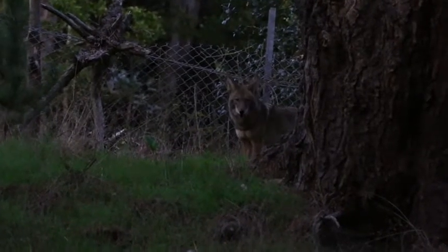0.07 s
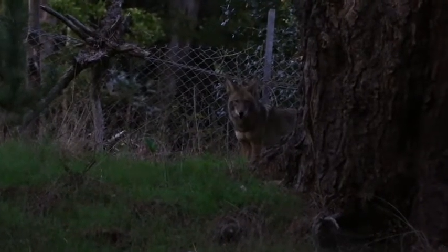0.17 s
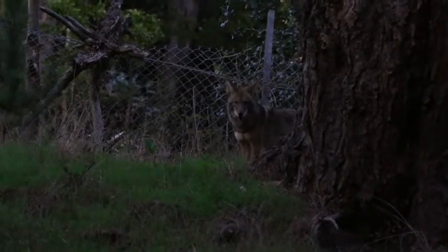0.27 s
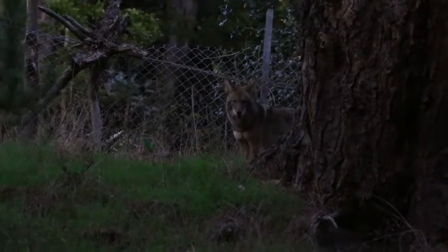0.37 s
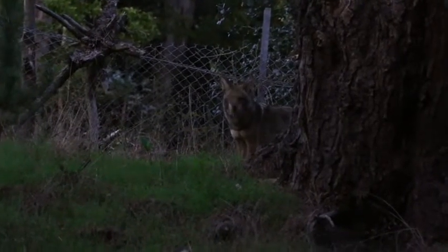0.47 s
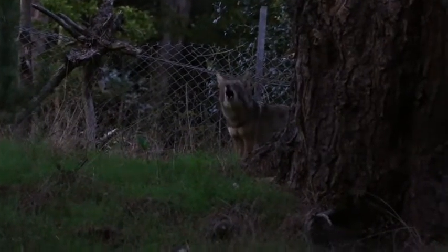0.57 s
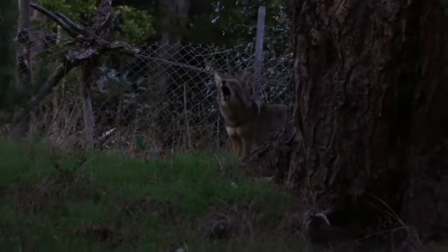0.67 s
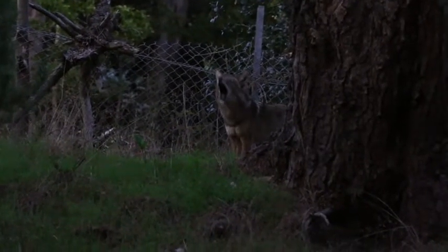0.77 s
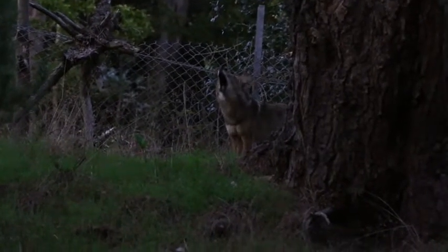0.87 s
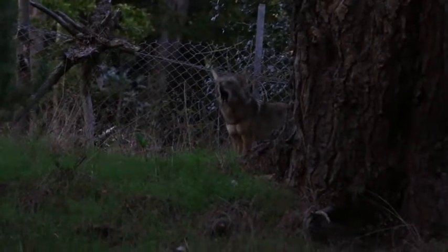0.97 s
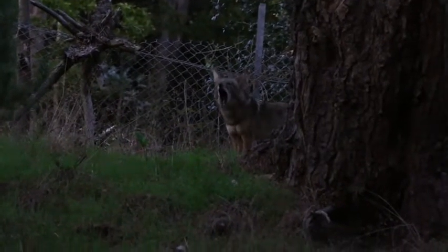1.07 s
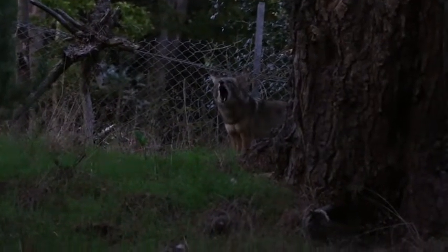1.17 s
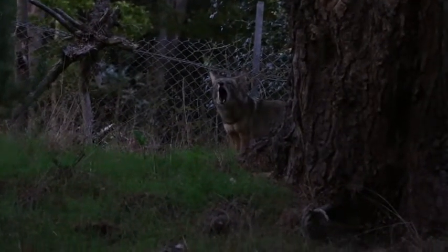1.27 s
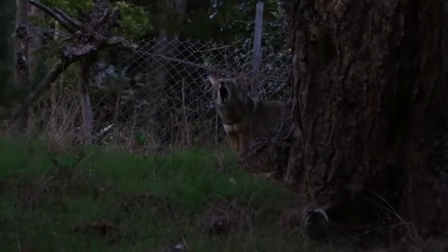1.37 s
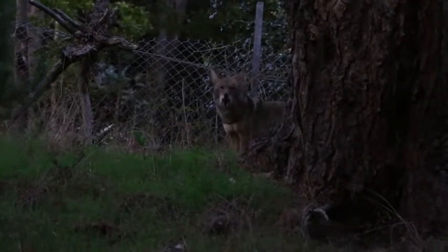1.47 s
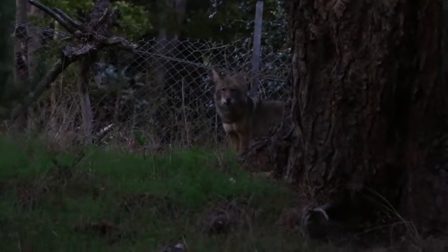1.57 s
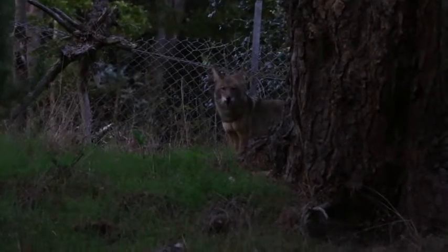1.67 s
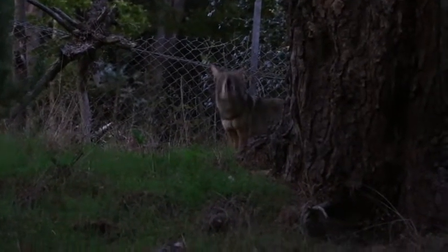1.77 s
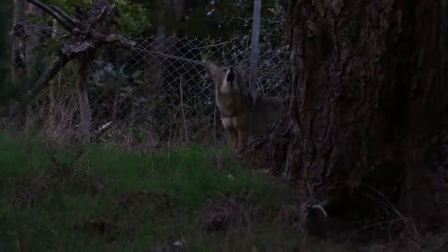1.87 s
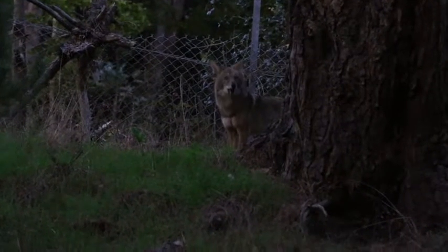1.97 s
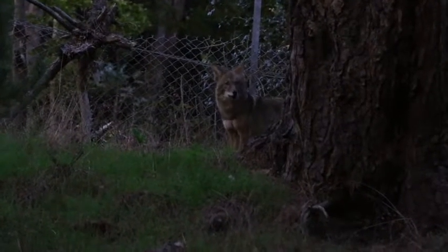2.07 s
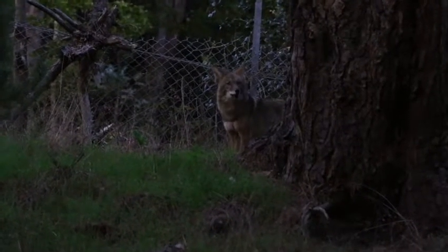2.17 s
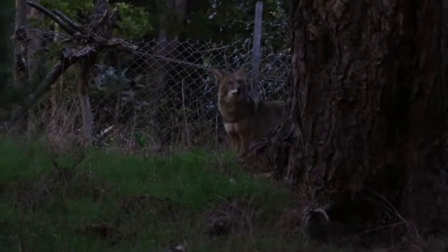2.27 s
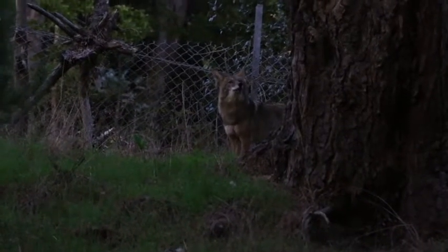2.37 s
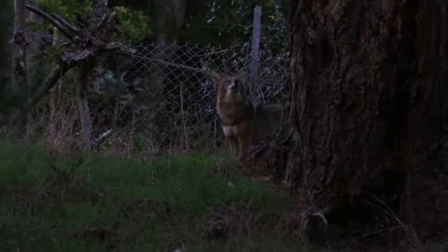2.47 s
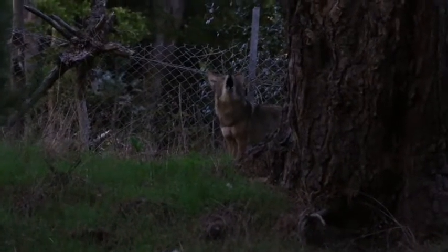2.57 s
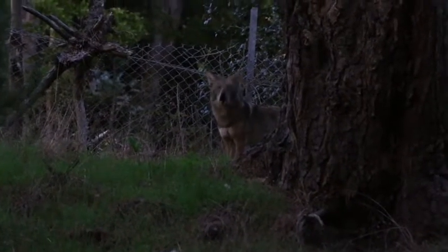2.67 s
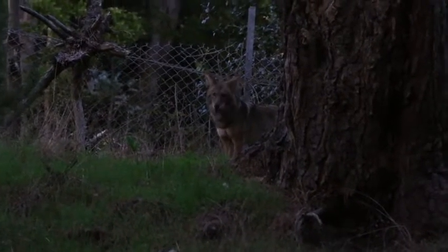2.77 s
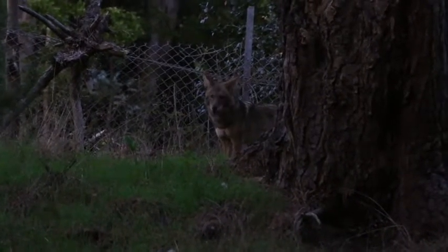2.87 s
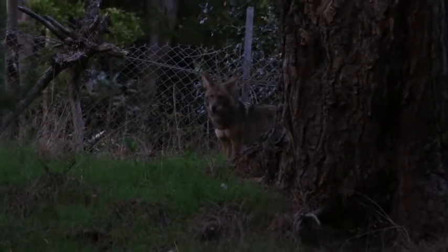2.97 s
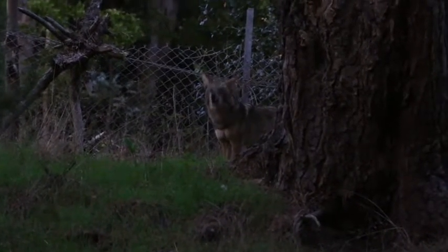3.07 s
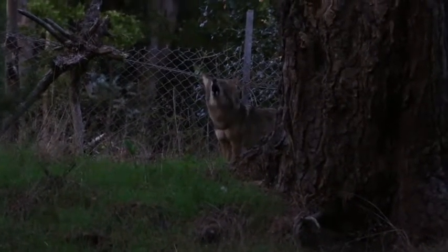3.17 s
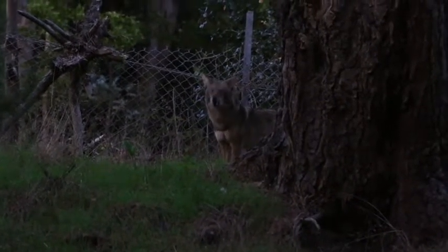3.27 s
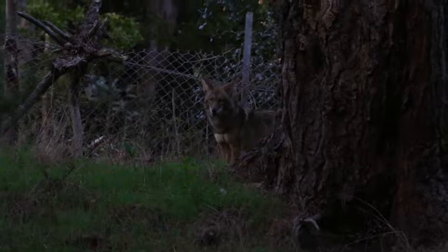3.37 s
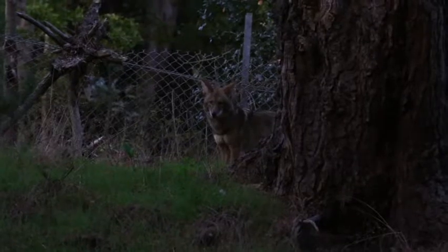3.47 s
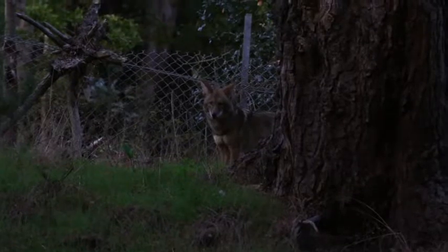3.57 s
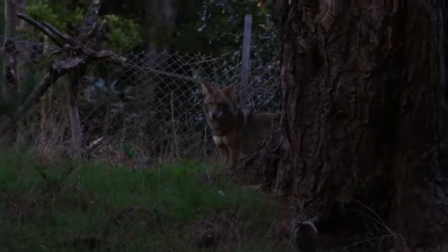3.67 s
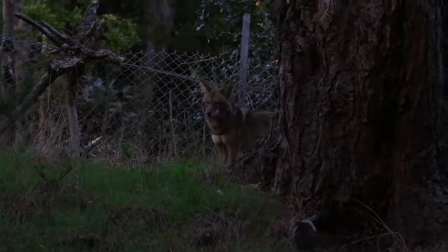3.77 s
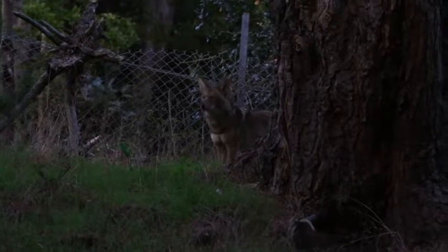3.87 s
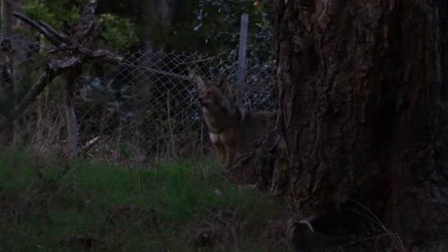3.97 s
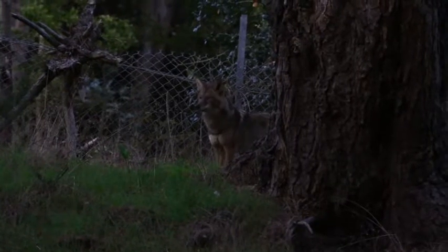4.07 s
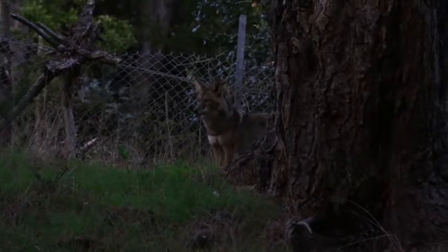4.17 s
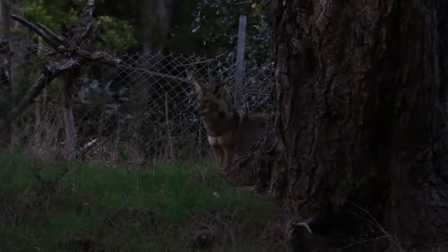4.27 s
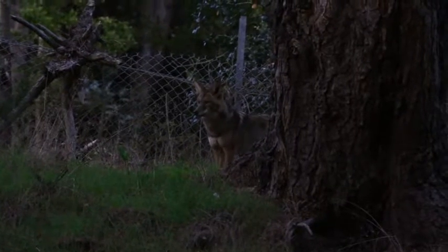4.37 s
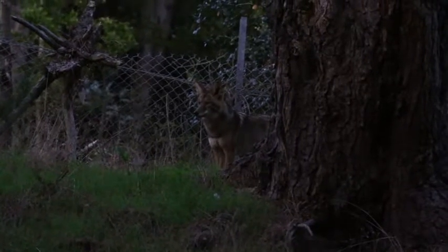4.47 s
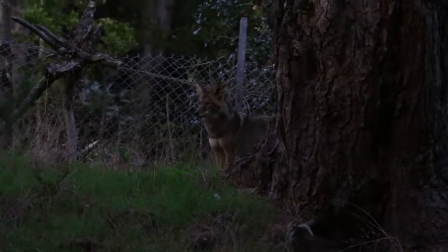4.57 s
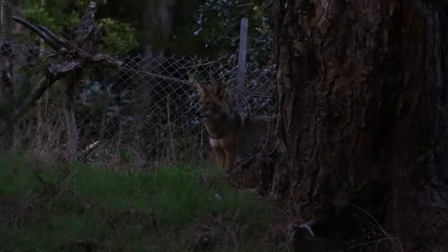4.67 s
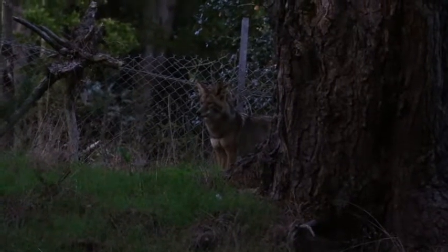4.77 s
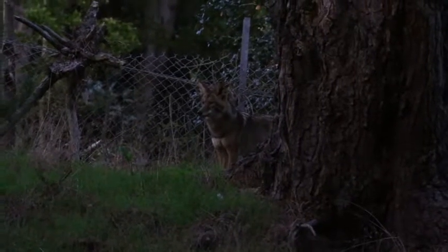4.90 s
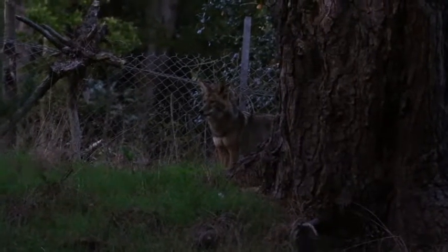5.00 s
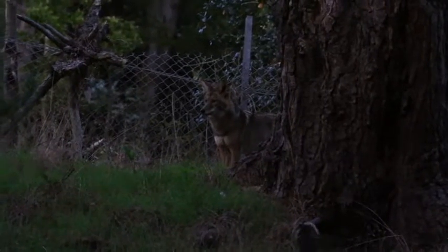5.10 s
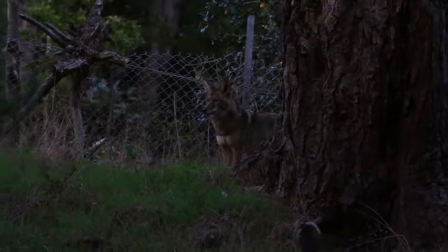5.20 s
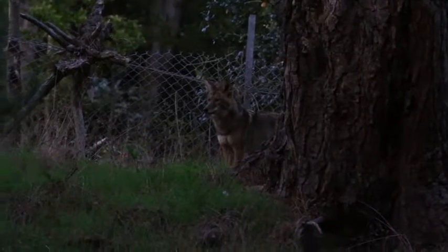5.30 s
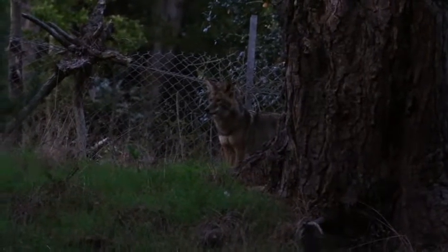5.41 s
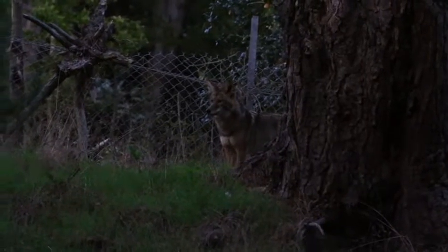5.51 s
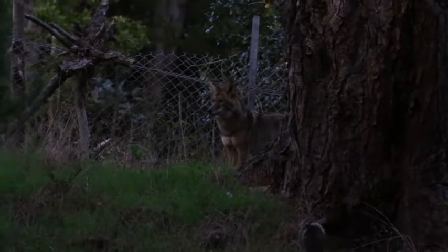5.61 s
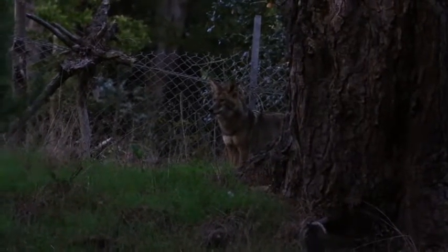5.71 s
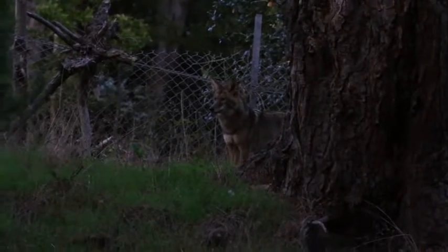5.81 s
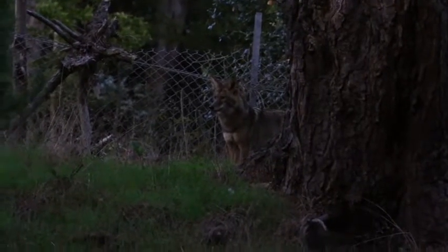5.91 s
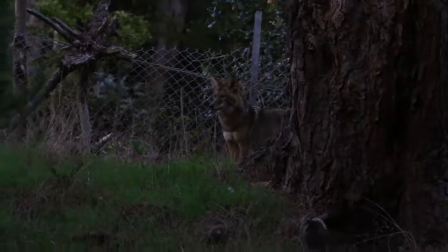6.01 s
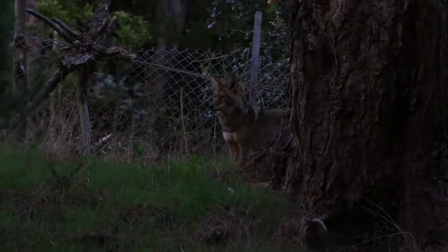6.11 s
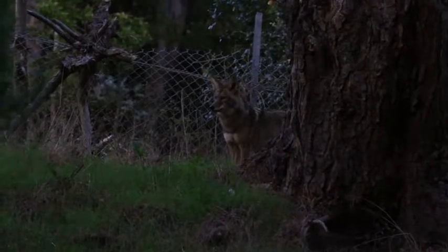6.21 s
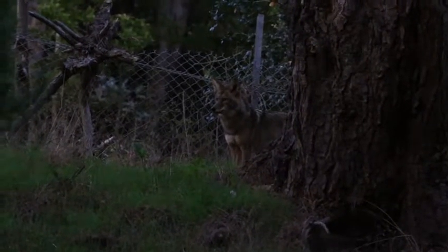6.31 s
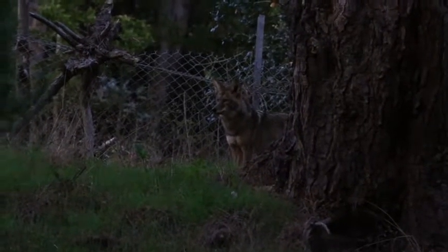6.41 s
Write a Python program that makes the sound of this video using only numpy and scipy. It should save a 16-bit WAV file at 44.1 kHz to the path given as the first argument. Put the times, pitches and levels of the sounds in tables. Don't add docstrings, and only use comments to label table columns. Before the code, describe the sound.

Hoarse coyote barks crack into shrill yelps, then three lone barks echo among trees; a distant dog answers faintly above a soft steady rumble.

```python
import sys
import numpy as np
from scipy import signal
from scipy.fft import rfft, irfft
from scipy.io import wavfile
from scipy.ndimage import uniform_filter1d

SR = 44100
rng = np.random.default_rng(int(sys.argv[2]) if len(sys.argv) > 2 else 0)


def decibels_to_gain(level_db):
    exponent = np.asarray(level_db, float) / 20
    return 10 ** exponent


def store_pcm(level_fs):
    pcm = np.round(np.clip(level_fs, -1, 1) * 32767).astype(np.int16)
    wavfile.write(sys.argv[1], SR, np.atleast_2d(pcm).T)


N = 284445

# [f/Hz, level per Hz/dB]
HUM_COLOR = [(12, -30), (20, -32), (85, -0.5), (191, -4), (306, -1), (550, -6), (668, -6.5), (790, -4),
             (1010, -5.5), (2470, -31), (3860, -34.5), (4960, -33.5), (5400, -35.5), (15600, -44.5)]
# [t/s, level/dB]
HUM_LEVEL = [(0.0, -38.5), (6.45, -38.5)]
# [f/Hz, likeness -1 to 1]
HUM_LIKENESS = [(60, 0.97), (180, 1), (550, 0.91), (1650, 0.47), (4970, -0.35), (15000, 0.26)]
# [f/Hz, left over right/dB]
HUM_LEAN = [(60, 0.34), (380, 0.58), (2380, 0.68), (15000, 0.81)]
# [t/s, level/dB, f/Hz]
INSECT_TICKS = [(3.796, -63, 4650), (3.917, -73, 4600), (4.4772, -62, 4310), (4.6841, -63, 4460),
                (4.7086, -64, 4560), (4.9979, -64, 4344), (5.3635, -65, 4317), (5.4224, -63, 4510),
                (5.5401, -63, 4560), (5.6389, -63, 4330), (5.8649, -70, 4133), (6.1473, -59, 4880)]
# [t/s, length/s, start f/Hz, end f/Hz, level/dB]
BIRD_CHIPS = [
    (3.82, 0.053, 7800, 6380, -60),
    (3.855, 0.075, 6380, 6200, -61),
    (4.02, 0.052, 6640, 6600, -68),
    (4.585, .012, 6800, 7900, -61),
    (4.365, .02, 2700, 2900, -60),
    (6.145, 0.026, 5100, 4770, -54.5),
    (6.17, .06, 4800, 4800, -68),
    (6.345, 0.055, 8180, 8500, -64),
]
# [t/s, length/s, start f/Hz, end f/Hz, level/dB]
FAR_DOG_NOTES = [
    (4.02, 0.096, 857, 940, -37.5),
    (4.03, 0.085, 1791, 1990, -48.5),
    (4.115, 0.06, 2160, 2070, -51),
    (4.25, 0.091, 880, 830, -31),
    (4.24, 0.14, 458, 396, -37.5),
    (4.25, 0.14, 1190, 1274, -45),
]
# [f/Hz, time to die by 60 dB/s]
WOOD_RING = [(400, 0.64), (700, 1), (1400, 1), (2200, 0.82), (3000, 1), (4000, 0.85), (6000, 0.55),
             (9000, 0.6), (14000, 0.96)]
# [delay/s, level/dB]
TREE_ECHOES = [(0.019, -7), (0.043, -10), (0.074, -22), (0.131, -27), (0.199, -47), (.27, -80),
               (0.431, -35.5)]
# [f/Hz, level/dB]
WOOD_COLOR = [(300, -5.5), (700, -9), (1400, -5), (2800, -16), (3300, -14), (5000, -19), (9000, -19),
              (14000, -14.5)]
# [f/Hz, share]
WOOD_SPREAD = [(400, 0.071), (2000, 0.8), (6000, 3.6), (12000, 3.4)]
# [f/Hz, width/Hz, level/dB]
THROAT_RINGS = [(1030, 134, -3), (1392, 380, -13.5), (1709, 890, -8)]
# [f/Hz, width/Hz, level/dB]
TEETH_RINGS = [(3260, 216, -22.5), (3810, 520, -31), (5580, 400, -35), (6720, 760, -34), (7410, 900, -32),
               (8400, 1780, -39.5), (10600, 1100, -53), (13000, 3500, -55.5)]
# [length/s, start f/Hz, end f/Hz, level under the bark/dB]
TEETH_HISS = (0.07, 5050, 5704, -36)
# [t/s, length/s, effort level/dB, top f/Hz, share of length before the chest gives out]
BARKS = [
    (0.611, .114, -9.5, 742, 0.63),
    (1.855, 0.13, -9.5, 815.4, 0.82),
    (2.596, .127, -6, 783, 0.61),
    (3.181, .134, -10, 784.4, 0.925),
]
RUN_ON_BARKS = [
    (.895, .062, -7.5, 820, .75),
    (1.135, 0.097, -10, 831.5, 0.76),
]
# [t/s, length/s, effort level/dB, start f/Hz, top f/Hz]
GROWLED_STARTS = [
    (.84, 0.072, -10, 796, 1030),
    (0.889, 0.033, -8.5, 825, 972),
    (1.075, 0.09, -19, 834, 1176),
]
# [t/s, length/s, effort level/dB, start f/Hz, end f/Hz]
ROUGH_ENDS = [
    (.75, .055, -11, 880, 830),
    (1.02, 0.051, -15.5, 880, 756),
    (1.476, 0.052, -11.5, 1000, 580),
]
VOICE_CRACKS = [
    (1.315, .06, -12, 978.6, 941),
]
EARLIER_BARK = (-.2, 0.1847, -22.5, 775.5, 757)
# [rise/share of length, rise depth/dB, chest over mouth level/dB,
# chest fade/dB, mouth fade/dB, mouth f per pitch f]
BARK_KIND = (0.39, 37.5, 1, 4, 8.1, 3.127)
RUN_ON_KIND = (0.58, 33, 0.83, 3.5, 4.6, 3.23)
GROWL_KIND = (1.85, 15.5, -1.5, 27, -1, 2.44)
END_KIND = (0.22, 46, 0.17, 44, 21.5, 2.84)
CRACK_KIND = (0.75, 19, -17, 6, 20.5, 2.5)
EARLIER_KIND = (.3, 20, 7, 3.9, 6, 2.94)
BARK_ROUGH = (.22, .4)
RUN_ON_ROUGH = (.12, .3)
GROWL_ROUGH = (.2, .45)
END_ROUGH = (.15, .4)
CRACK_ROUGH = (.6, .45)
# [f/Hz, level/dB]
YELP_COLOR = [(3200, 0.5), (4300, -23), (5700, -32), (7200, -21.5), (8600, -27), (10000, -34.5),
              (11500, -34.5), (13000, -36), (15000, -37)]
# [t of the top/s, top f/Hz]
YELP_ARCHES = [
    (-.21, 1412),
    (.727, 1378),
    (.981, 1550),
    (1.235, 1465),
    (1.434, 1441),
    (2.69, 1350),
]
# [upper partials level/dB, half-pitch lines 0-1, hoarseness 0-1]
YELP_VOICES = [
    (-20.5, 0, 0.1),
    (-14.5, 0, 0.11),
    (-20, 0.98, 0.45),
    (-18.5, 0, 0.04),
    (-20, 0.03, 0.05),
    (-25.5, 0.37, 0.27),
]
# [t/s, level/dB]
YELP_BREATH = [
    [(-.26, -15.5), (-.17, -20)],
    [(.716, -7), (.74, -20), (.752, -14), (.76, -33)],
    [(.94, -12.5), (.962, -12), (1.0, -9.5), (1.015, -22.5), (1.035, -18.5)],
    [(1.222, -7), (1.25, -29.5), (1.28, -13), (1.293, -19), (1.306, -15), (1.324, -28)],
    [(1.364, -30.5), (1.392, -16), (1.405, -21), (1.455, -13.5), (1.472, -18.5), (1.48, -21), (1.491, -38)],
    [(2.665, -22), (2.69, -15), (2.72, -19.5)],
]


def evened(x):
    return x / np.sqrt(np.mean(x ** 2) + 1e-20)


def read(points, hz):
    f, value = np.transpose(points)
    return np.interp(np.log(hz + 1), np.log(f + 1), value)


def add(mix, s, sound):
    part = mix[round(s * SR):][:len(sound)]
    part += sound[:len(part)]


def wander(count, hz):
    pole = np.exp(-2 * np.pi * 1.5 * hz / SR)
    noise = rng.standard_normal(count + 2000)
    smooth = signal.lfilter([1], np.convolve([1, -pole], [1, -pole]), noise)
    return np.clip(evened(smooth[-count:]), -2, 2)


def resonate(x, hz, width):
    turn = np.exp(2j * np.pi * np.cumsum(hz * np.ones(len(x))) / SR)
    r = np.exp(-np.pi * width / SR)
    once = signal.lfilter([1 - r], [1, -r], x / turn)
    twice = signal.lfilter([1 - r], [1, -r], once)
    return 2 * (turn * twice).real


def hum(patchy_db=1.17):
    frames, hz = N // 256 + 5, np.fft.rfftfreq(1024, 1 / SR)
    a, b, c, d, patches = rng.standard_normal((frames, 513, 5)).T
    patches = uniform_filter1d(patches, size=8, axis=0)
    patches = evened(uniform_filter1d(patches, size=20, axis=1))
    same = np.clip(read(HUM_LIKENESS, hz), -1, 1)[:, None]
    left = a + 1j * b
    right = same * left + np.sqrt(1 - same ** 2) * (c + 1j * d)
    lean_db = np.outer([.5, -.5], read(HUM_LEAN, hz))[:, :, None]
    level_db = read(HUM_COLOR, hz)[:, None] + patchy_db * patches + lean_db
    spectra = np.array([left, right]) * decibels_to_gain(level_db)
    sound = signal.istft(spectra, nperseg=1024, noverlap=768)[1][:, :N]
    s, db = np.transpose(HUM_LEVEL)
    return decibels_to_gain(np.interp(np.arange(N) / SR, s, db)) * evened(sound)


def insect(length=0.0069):
    out, t = np.zeros(N), np.arange(0, length, 1 / SR)
    for s, db, hz in INSECT_TICKS:
        add(out, s, decibels_to_gain(db + 6) * np.sin(2 * np.pi * hz * t) * np.hanning(len(t)))
    return out


def far_calls(table, tone_share=0.23, blur=0.13):
    out = np.zeros(N)
    for s, length, hz, end_hz, db in table:
        glide = np.linspace(hz, end_hz, round(length * SR))
        tone = np.sqrt(2) * np.sin(2 * np.pi * np.cumsum(glide) / SR)
        fuzz = evened(resonate(rng.standard_normal(len(glide)), glide, blur * hz))
        note = tone_share * tone + 0.65 * fuzz
        add(out, s, decibels_to_gain(db) * note * signal.windows.tukey(len(glide), .5))
    return out


def wood(x, tail_db=-10, smear=.1):
    t = np.arange(2 * SR) / SR
    taps = rng.standard_normal((3, len(t)))
    build_up = np.clip((t - .006) / .03, 0, 1)
    hz, ts, z = signal.stft(taps * build_up, SR, nperseg=256)
    dying = decibels_to_gain(-60 * ts / read(WOOD_RING, hz)[:, None])
    tail = signal.istft(z * dying, SR, nperseg=256)[1][:, :len(t)]
    echoes = np.zeros(len(t))
    for s, db in TREE_ECHOES:
        spread_s = smear * s
        echoes += decibels_to_gain(db) * np.exp(-((t - s) / spread_s) ** 2) / np.sqrt(spread_s * SR)
    field = rfft(decibels_to_gain(tail_db) * tail / np.linalg.norm(tail[0]) + taps * echoes)
    hz = np.fft.rfftfreq(len(t), 1 / SR)
    sides = field[0] + read(WOOD_SPREAD, hz) * field[1:]
    sides = irfft(sides * decibels_to_gain(read(WOOD_COLOR, hz)))
    return signal.fftconvolve(x[None], sides, axes=1)[:, :len(x)]


def first_hiss():
    length, hz, end_hz, db = TEETH_HISS
    hisses = [(row[0], length, hz, end_hz, row[2] + db) for row in BARKS]
    return far_calls(hisses, tone_share=0, blur=.1)


def bark_motion(row, kind, roughness, climbs, chest_share=1):
    s, length, effort_db, first_hz, last_hz = row
    rise, depth_db, chest_db, chest_fade_db, mouth_fade_db, ratio = kind
    rough_start, rough_end = roughness
    give_out_db, give_out_s, wide_open_hz = 21, 0.009, 2700
    u = np.arange(0, length, 1 / SR) / length
    before = np.maximum(1 - u / rise, 0)
    after = np.maximum(u - rise, 0) / (1 - rise)
    level_db = effort_db - depth_db * before ** 1.75
    given_out = np.clip((u - chest_share) * length / give_out_s, 0, 1)
    path = np.sin(np.pi * .58 * u ** 1.3) if climbs else u
    hz = first_hz + (last_hz - first_hz) * path
    chest_level_db = level_db + chest_db - chest_fade_db * after ** 2 - give_out_db * given_out
    mouth_level_db = level_db - mouth_fade_db * after ** 2
    mouth_hz = np.minimum(ratio * hz, wide_open_hz)
    rough = rough_start + (rough_end - rough_start) * u
    return s, chest_level_db, hz, mouth_hz, mouth_level_db, rough


def bark(motion, count=2, half=2.62, lift=0.21, unveil=1.3, slide=.24, rasp=0.58, muzzle_hz=3400):
    s, chest_db, hz, mouth_hz, mouth_db, rough = motion
    jitter, shimmer_db, patch_db = .24, 7, 4.5
    size = len(hz)
    rough, opening = np.clip(rough, 0, 1), mouth_hz / 2600
    groups = np.cumsum(hz / count * (1 + jitter * rough * wander(size, 210))) / SR
    between = np.minimum(half * rough, 1)
    folds = np.zeros(size)
    for k in range(2, 34):
        folds += (between if k % count else 1) * np.cos(2 * np.pi * k * groups)
    folds *= decibels_to_gain(shimmer_db * rough * wander(size, 370))
    puffs = (.5 + np.exp(-(count * groups % 1) / 2.5)) * rng.standard_normal(size)
    drive = (1 - rough) * evened(folds) + rough * evened(puffs)
    airy = drive + rasp * rng.standard_normal(size)
    chest = evened(resonate(drive, hz, 300))
    lips = resonate(drive, np.minimum(1.16 * mouth_hz, 2800), 330)
    mouth = resonate(drive, mouth_hz, 520) + 0.55 * resonate(drive, 0.935 * mouth_hz, 400) - 0.63 * lips
    throat, teeth = np.zeros(size), np.zeros(size)
    for f, width, db in THROAT_RINGS:
        throat += decibels_to_gain(db) * resonate(drive, f * (1.17 * opening) ** lift, width)
    for f, width, db in TEETH_RINGS:
        teeth += decibels_to_gain(db + patch_db * wander(size, 20)) * resonate(airy, f * opening ** slide, width)
    muzzle = signal.butter(2, muzzle_hz, fs=SR, output="sos")
    body = signal.sosfilt(muzzle, 1.64 * throat - 0.69 * mouth)
    upper = (body + 1.23 * opening ** unveil * teeth) / np.std(mouth)
    sound = decibels_to_gain(chest_db) * chest + decibels_to_gain(mouth_db) * upper
    return s, sound * signal.windows.tukey(size, .3)


def yelp_motion(top, voice, effort):
    top_s, top_hz = top
    upper_db, half, hoarse = voice
    s, db = np.transpose(effort)
    t = np.arange(s[0], s[-1], 1 / SR)
    away = (t - top_s) / max(s[-1] - top_s, .05)
    droop = .125 * np.maximum(away, -away / 1.2) ** 3.2
    hz = top_hz * (1 - droop)
    effort_db = np.interp(t, s, db)
    catch = 0.13 * np.exp(-(t - s[0]) / .012)
    steady_db = upper_db - np.maximum(effort_db, -22)
    return s[0], hz, effort_db, steady_db, half + catch, hoarse + catch


def yelp(motion, breath_db=-10, hiss_db=10, dull_db=55):
    s, hz, effort_db, upper_db, half, hoarse = motion
    waver, slip = .001, .022
    flutter_db, flutter_hz = 8, 200
    size = len(hz)
    hoarse = np.clip(hoarse, 0, 1)
    pairs = np.cumsum(hz / 2 * (1 + (waver + slip * hoarse) * wander(size, 214))) / SR
    air = rng.standard_normal(size)
    breath = resonate(air, 1.8 * hz, 1900)
    hiss = sum(decibels_to_gain(db) * resonate(air, f, width) for f, width, db in TEETH_RINGS)
    hiss *= decibels_to_gain(hiss_db + wander(size, 60))
    voice = np.sqrt(hoarse) * (decibels_to_gain(breath_db) * np.sqrt(hoarse) * breath + hiss) / np.std(breath)
    for k in range(1, 22):
        octaves = np.maximum(np.log2(k * hz / 8400), 0)
        db = read(YELP_COLOR, k * hz / 2) + upper_db * (k > 2) - dull_db * hoarse * octaves
        db += flutter_db * hoarse * wander(size, flutter_hz)
        weight = 1
        if k % 2:
            weight = np.abs(half) * (0.27 if k == 1 else 1)
        voice += np.sqrt(2) * decibels_to_gain(db) * weight * np.cos(2 * np.pi * k * pairs + k * k)
    return s, decibels_to_gain(effort_db) * voice * signal.windows.tukey(size, .1)


def coyote(lead_s=.4):
    out = np.zeros(N + round(lead_s * SR))
    calls = []
    for rows, kind, rough, start in [(BARKS, BARK_KIND, BARK_ROUGH, .655),
                                     (RUN_ON_BARKS, RUN_ON_KIND, RUN_ON_ROUGH, .72)]:
        for s, length, db, hz, share in rows:
            climb = (s, length, db, start * hz, hz)
            calls.append(bark(bark_motion(climb, kind, rough, True, share)))
    for row in ROUGH_ENDS:
        calls.append(bark(bark_motion(row, END_KIND, END_ROUGH, False)))
    calls.append(bark(bark_motion(EARLIER_BARK, EARLIER_KIND, END_ROUGH, False)))
    for row in GROWLED_STARTS:
        calls.append(bark(bark_motion(row, GROWL_KIND, GROWL_ROUGH, True), count=3))
    for row in VOICE_CRACKS:
        calls.append(bark(bark_motion(row, CRACK_KIND, CRACK_ROUGH, False), count=3))
    for top, voice, effort in zip(YELP_ARCHES, YELP_VOICES, YELP_BREATH):
        calls.append(yelp(yelp_motion(top, voice, effort)))
    for s, sound in calls:
        add(out, s + lead_s, sound)
    small_body = signal.butter(3, 430, "high", fs=SR, output="sos")
    return signal.sosfilt(small_body, out)


def scene():
    voice = coyote()
    near = (voice + wood(voice))[:, -N:] * decibels_to_gain(np.array([[4.6], [3.5]]))
    dog = far_calls(FAR_DOG_NOTES)
    birds = far_calls(BIRD_CHIPS, tone_share=0.134, blur=.05)
    far = dog + birds + insect() + first_hiss()
    return near + far * decibels_to_gain(np.array([[.3], [-.3]])) + hum()


def roll_off(x):
    return signal.sosfilt(signal.butter(12, 15700, fs=SR, output="sos"), x)


def record(dry, knee_db=-25, share=0.41, recover_db=110, memory_s=0.47, memory_share=0.093):
    power_db = 10 * np.log10(abs(uniform_filter1d((dry ** 2).mean(0), size=600)) + 1e-12)
    fall = np.arange(N) * recover_db / SR
    held_db = np.maximum.accumulate(power_db + fall) - fall
    over_db = np.maximum(held_db - knee_db, 0)
    keep = np.exp(-1 / (memory_s * SR))
    memory_db = signal.lfilter([1 - keep], [1, -keep], over_db)
    duck_db = share * uniform_filter1d(over_db, size=400) + memory_share * memory_db
    ducked = dry / decibels_to_gain(duck_db)
    ducked = np.tanh(ducked / 1.3) * 1.3
    edge = signal.firwin(511, 15750, window=("kaiser", 9), fs=SR)
    return roll_off(signal.oaconvolve(ducked, edge[None], "same"))


dry = scene()
out = record(dry)
store_pcm(out)
```